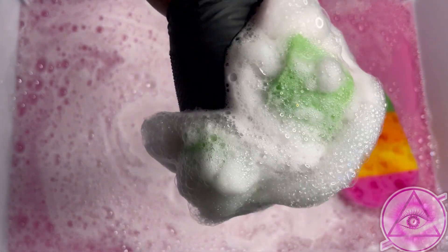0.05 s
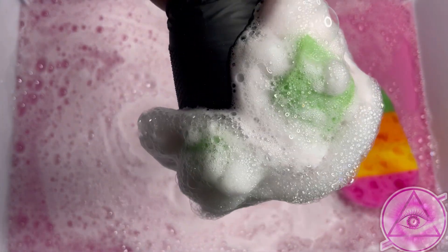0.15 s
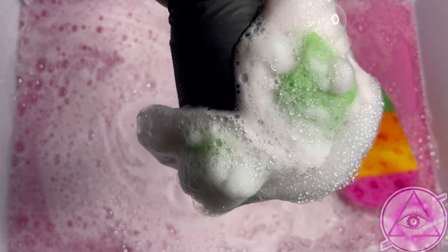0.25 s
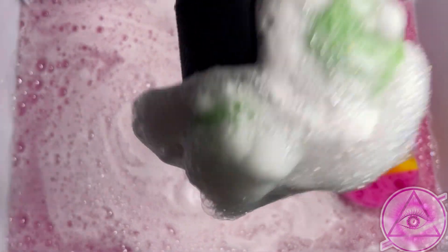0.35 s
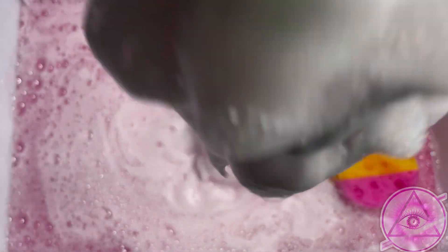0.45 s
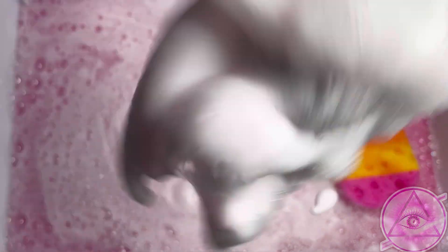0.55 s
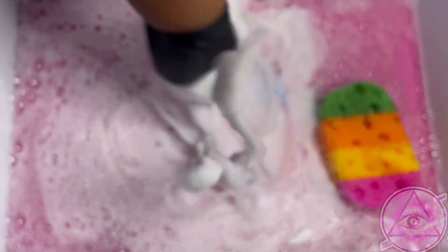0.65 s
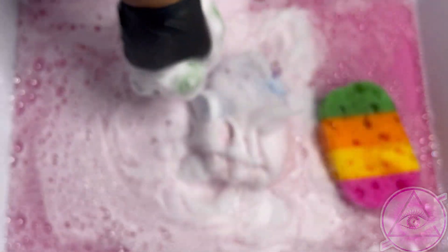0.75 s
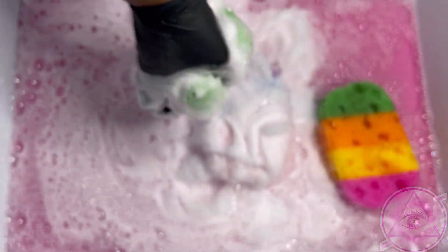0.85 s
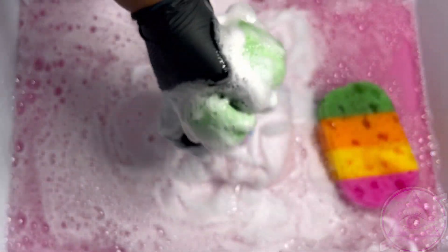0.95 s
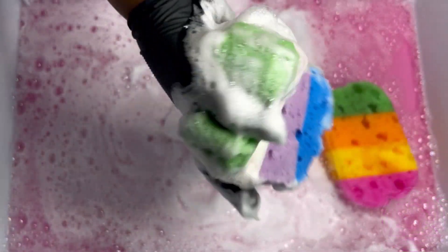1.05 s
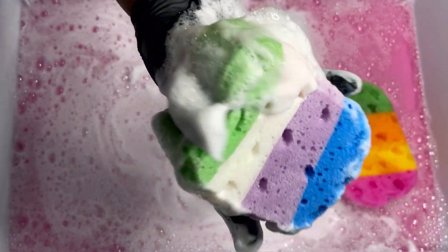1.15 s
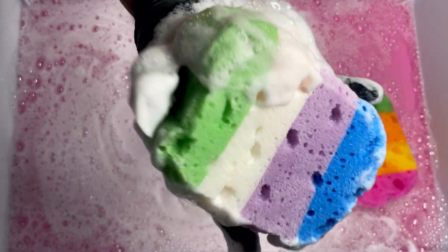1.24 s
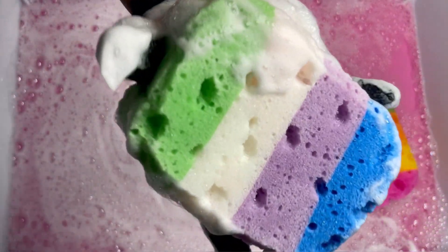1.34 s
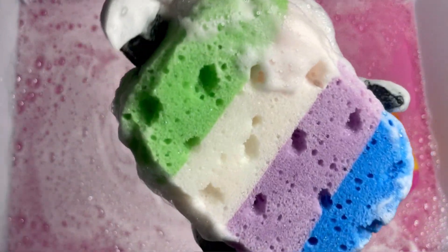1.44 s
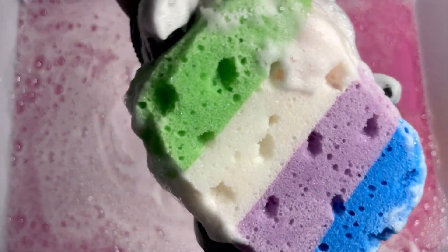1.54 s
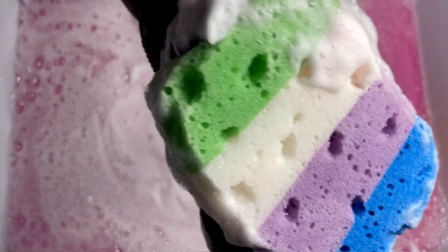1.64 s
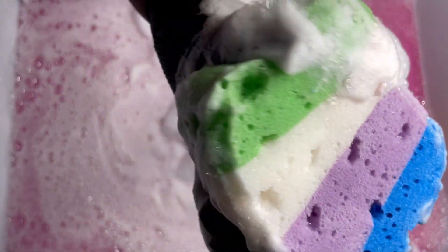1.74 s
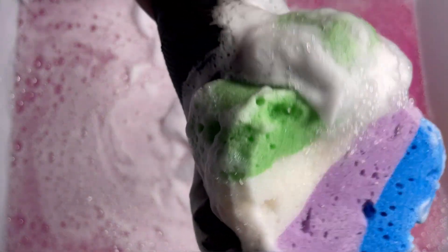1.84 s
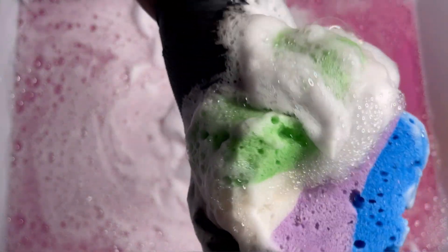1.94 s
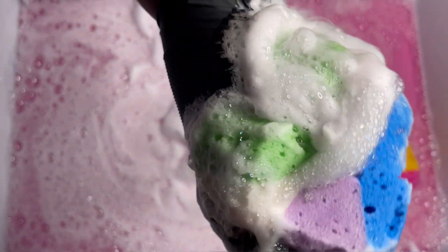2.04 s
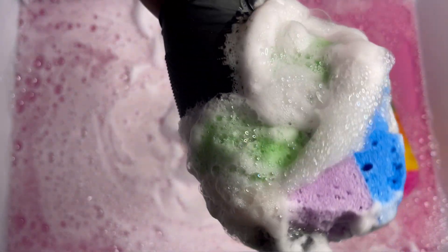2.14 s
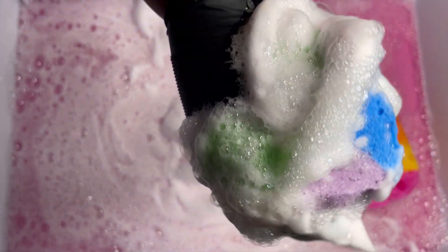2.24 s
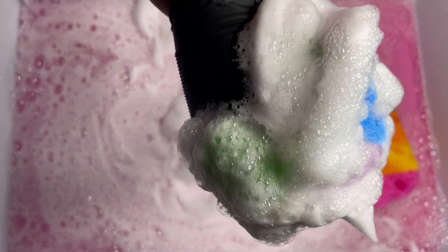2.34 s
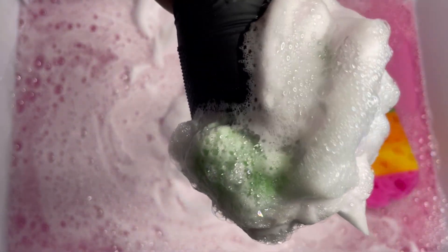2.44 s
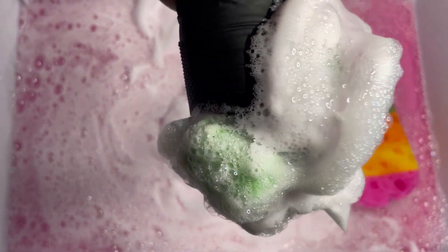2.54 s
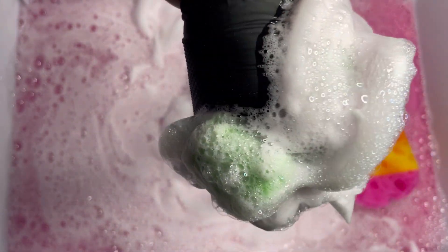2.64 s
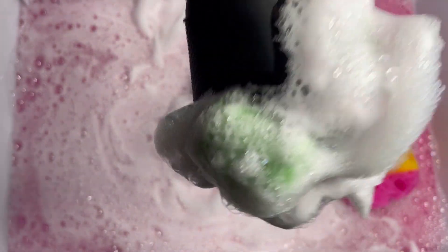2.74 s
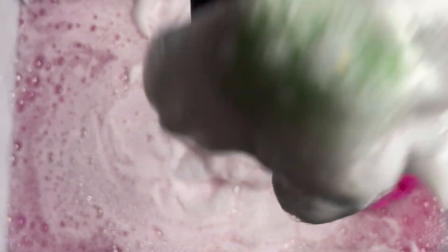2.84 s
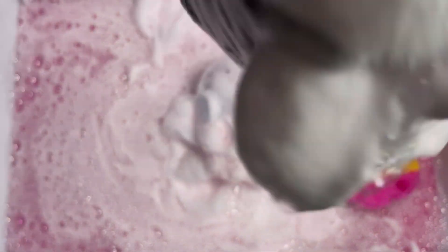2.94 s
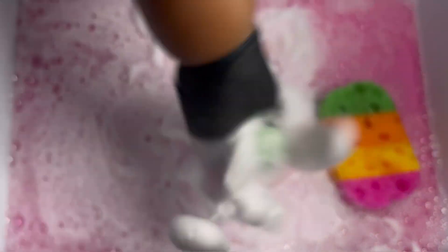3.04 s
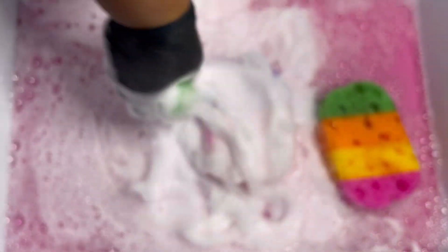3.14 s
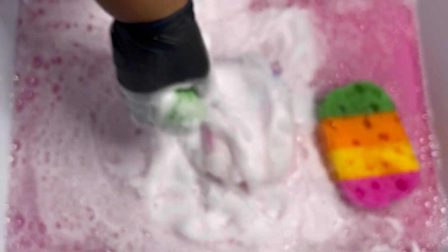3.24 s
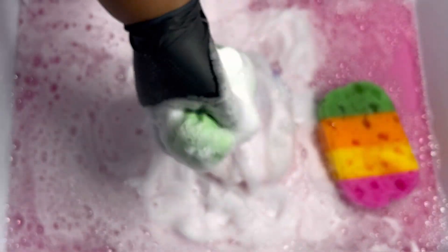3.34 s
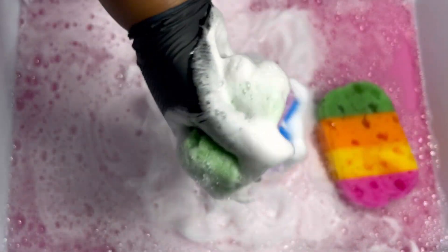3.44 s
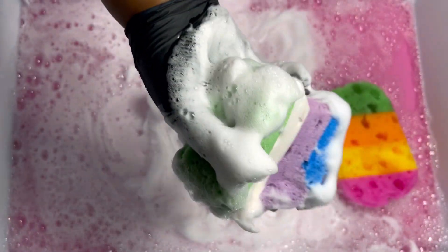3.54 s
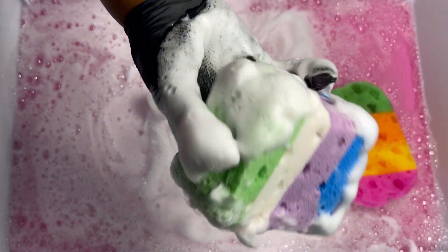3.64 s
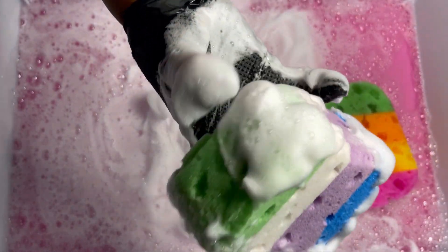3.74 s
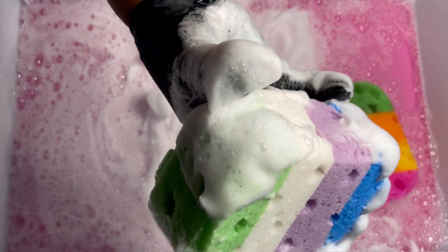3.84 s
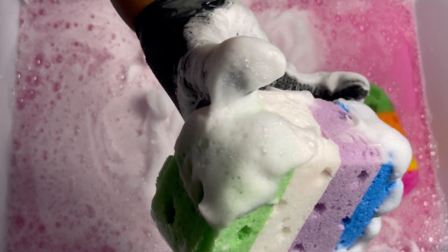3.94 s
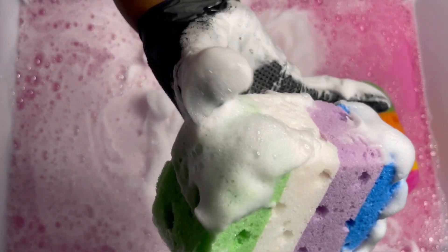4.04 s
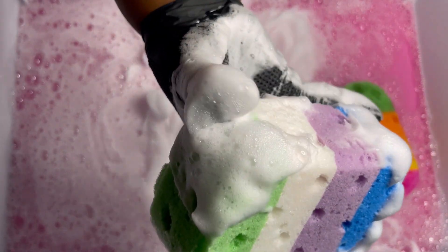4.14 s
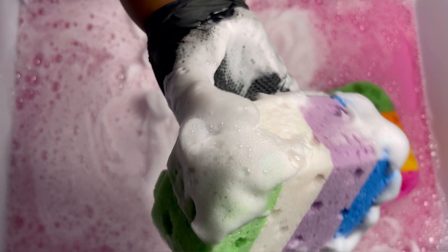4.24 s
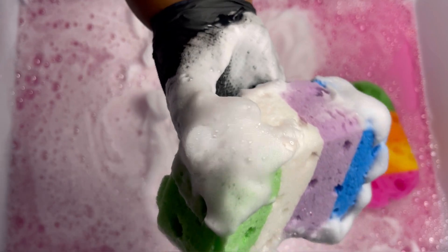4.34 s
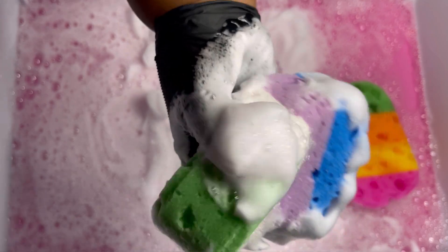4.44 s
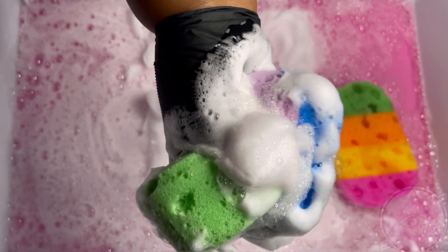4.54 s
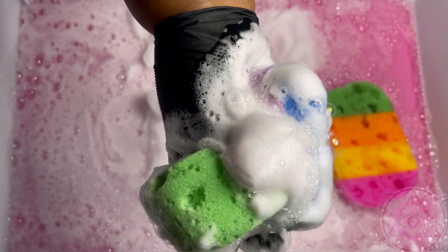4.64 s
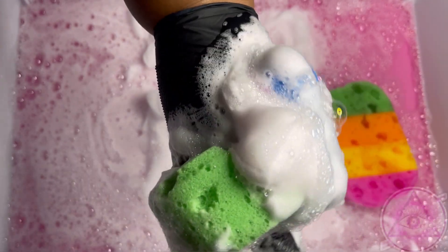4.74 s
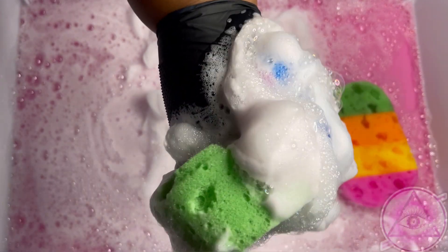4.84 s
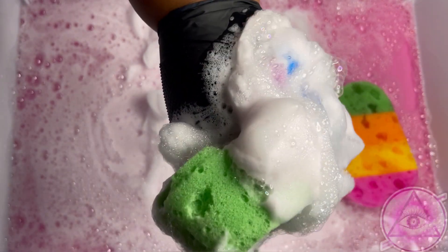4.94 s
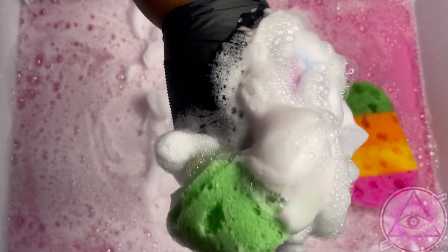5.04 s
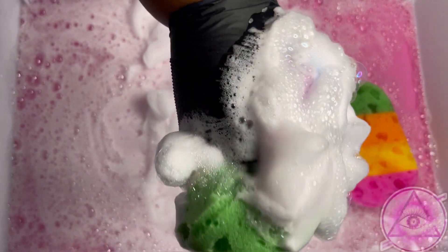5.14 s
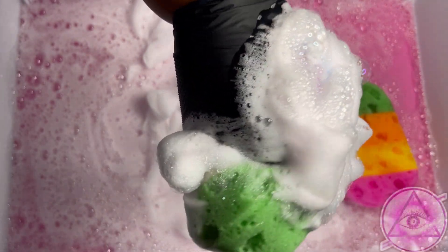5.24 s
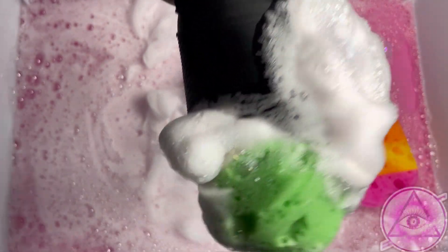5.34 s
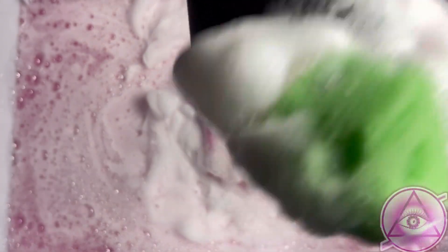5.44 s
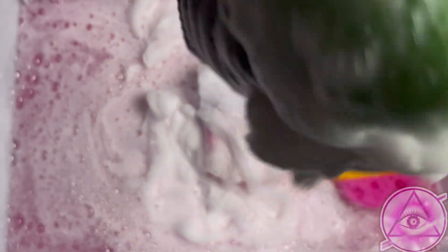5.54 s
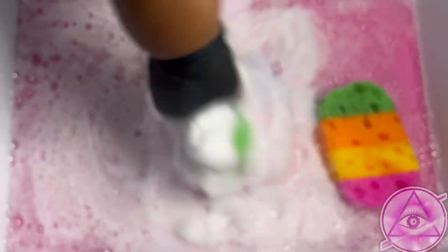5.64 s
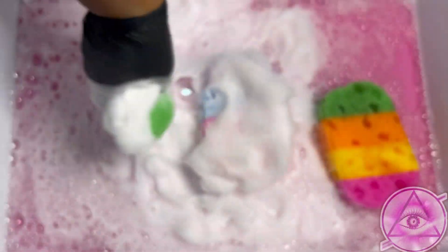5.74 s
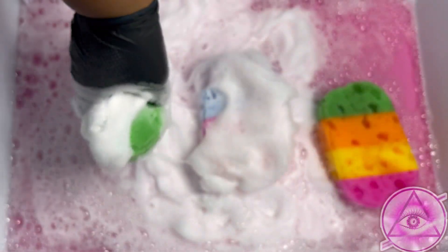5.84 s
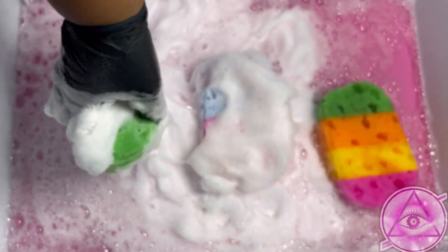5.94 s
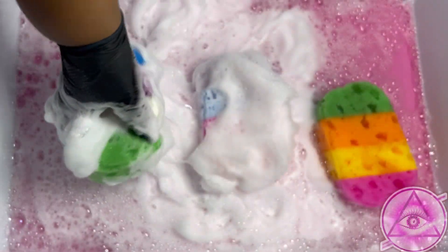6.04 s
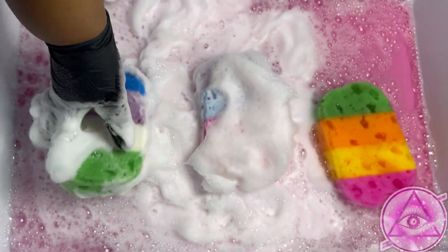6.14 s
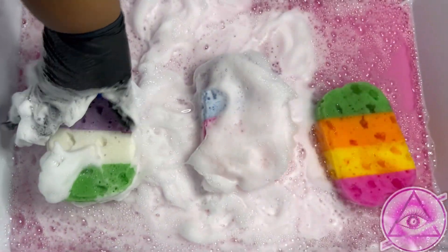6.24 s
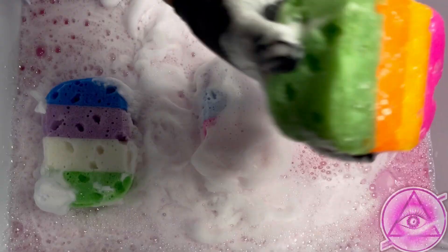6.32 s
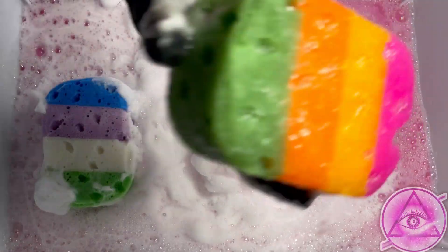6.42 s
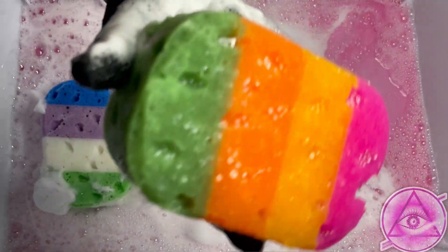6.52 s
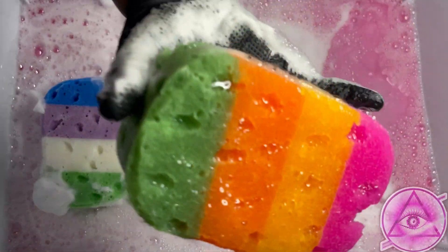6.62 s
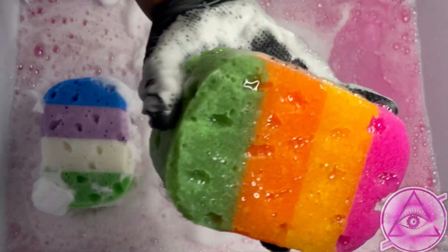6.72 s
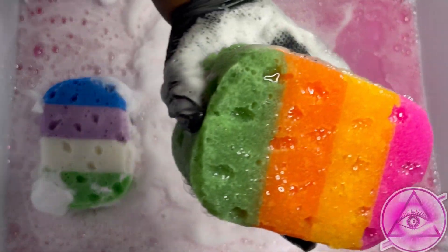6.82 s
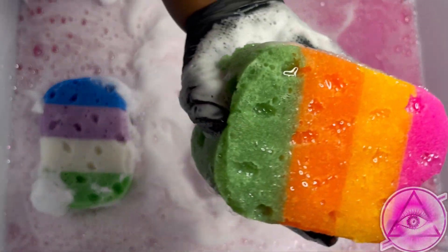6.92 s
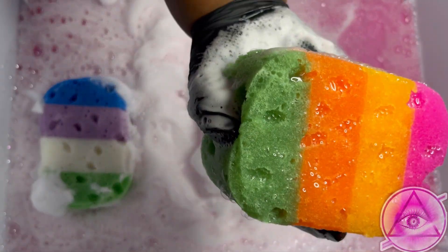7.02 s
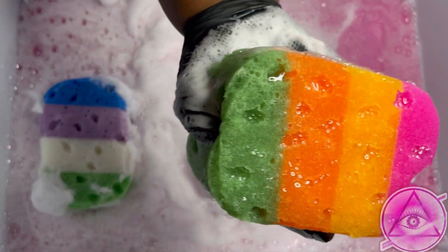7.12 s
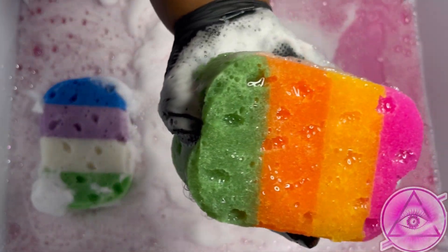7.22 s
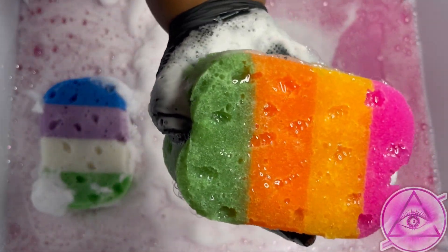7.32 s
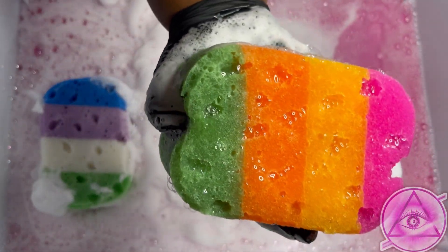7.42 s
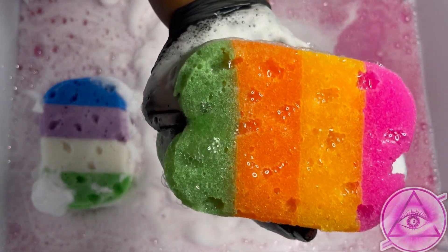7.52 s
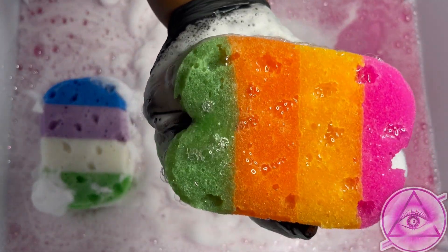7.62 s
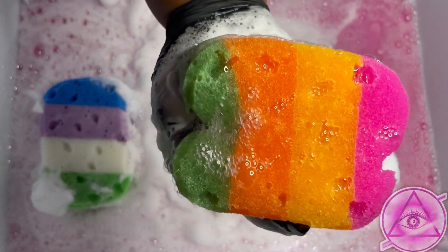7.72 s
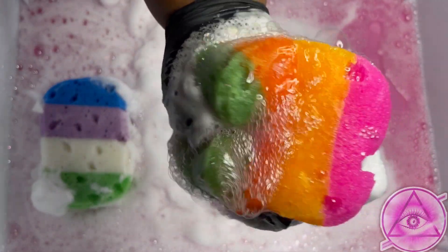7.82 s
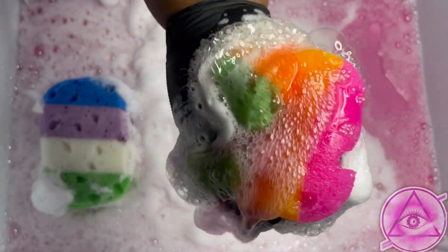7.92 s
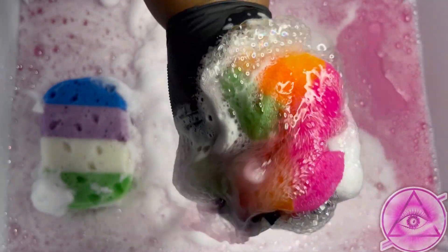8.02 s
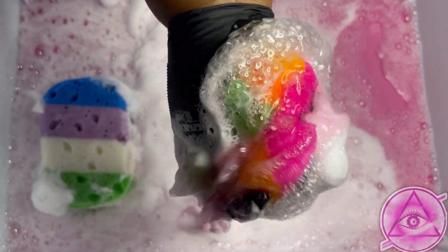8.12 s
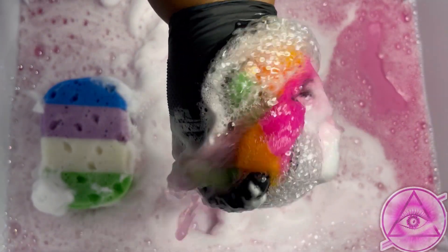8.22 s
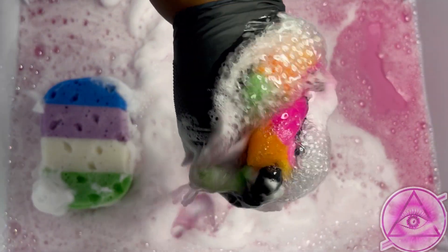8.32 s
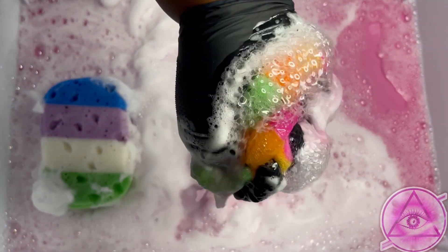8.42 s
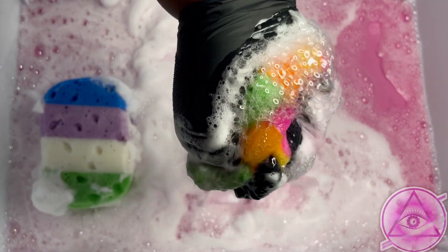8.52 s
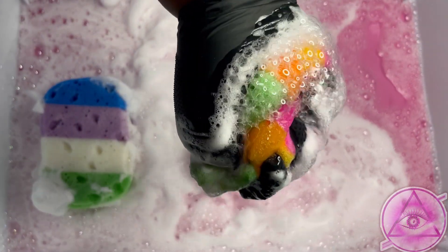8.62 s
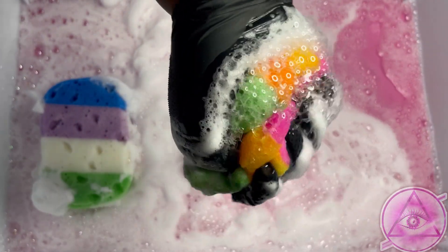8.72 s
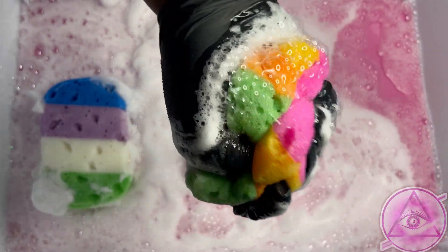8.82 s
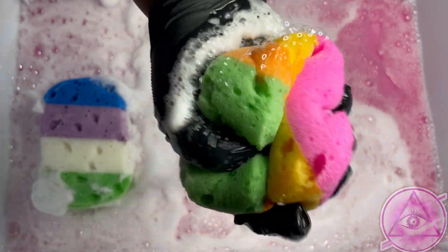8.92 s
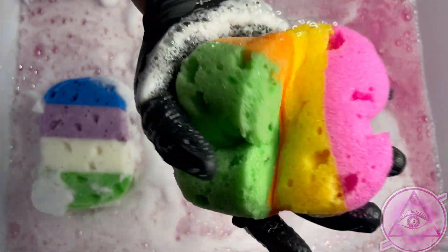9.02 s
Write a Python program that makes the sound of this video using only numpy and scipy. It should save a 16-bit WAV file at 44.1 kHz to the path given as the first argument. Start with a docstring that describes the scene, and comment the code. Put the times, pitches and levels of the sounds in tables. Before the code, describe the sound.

Soapy sponges are squeezed close up in a gloved hand: thick wet squelches, fizzing foam, sharp bubble cracks and splashy plops into a tub.

```python
"""A gloved hand squeezes soapy sponges over a plastic tub of foamy water, close to a pair of microphones.
Each squeeze drives air through wet pores: swarms of short ringing bubbles, from fine fizz to large squelch.
Soap films tear in sharp clicks, foam slaps down as shaped noise, and single bubbles snap at their own pitch.
Behind them the tub rumbles, runoff burbles, and gulps, a slap and the tub ring as short gliding sines.
Farthest back are quiet noise for the room air and a faint mains buzz of steady sines; a dull switch tick
sounds as the buzz steps down."""
import sys
import numpy as np
from scipy import signal
from scipy.fft import rfft, irfft, next_fast_len
from scipy.io import wavfile
from scipy.ndimage import uniform_filter1d

SR = 44100
rng = np.random.default_rng(int(sys.argv[2]) if len(sys.argv) > 2 else 0)


def dump_mix(stems):
    """Bounce the given channels to the path in sys.argv[1] as a 16-bit WAV at rate SR."""
    frames = np.atleast_2d(stems).T  # one column per channel
    limited = np.clip(frames, -1, 1)  # hard clip at full scale
    pcm = np.round(limited * 32767).astype(np.int16)
    wavfile.write(sys.argv[1], SR, pcm)


N = 399987
T = np.arange(N) / SR  # time axis [s]

# Levels in the event tables are those before the trims of the functions that play them.
# how hard the hand drives air through the sponge: (time [s], level [dB])
FIRST_SQUEEZE = [(0, -41.5), (0.06, -38.5), (0.15, -42.5), (0.33, -58.5), (0.47, -102.5)]
SECOND_SQUEEZE = [(1.44, -78.5), (1.582, -60.5), (1.738, -44.5), (2.0, -44.5), (2.26, -43.5), (2.34, -48),
                  (2.52, -49), (2.66, -43), (2.82, -53.5), (2.88, -91)]
THIRD_SQUEEZE = [(4.1, -71.5), (4.24, -57), (4.32, -59), (4.463, -40), (4.62, -48), (4.75, -46.5),
                 (4.86, -41.5), (5.04, -44), (5.14, -40.5), (5.29, -44), (5.46, -53), (5.53, -65)]
FRESH_SQUEEZE = [(7.58, -85), (7.7, -70), (7.81, -59), (8.04, -64), (8.12, -53.5), (8.3, -58), (8.45, -57),
                 (8.7, -55.5)]
RELEASE = [(8.701, -65), (8.738, -52.5), (8.77, -44), (8.92, -44), (9.07, -47.5)]
# when the fine and the medium bubbles give out, a row per stroke above: (fine over medium [dB],
# large over medium [dB], fine give out at [s], fine take [s], medium give out at [s])
FOAM_SIZES = [(-19, 7.5, 0.034, 0.97, 0.01), (1, -12, 2.22, 0.23, 2.22), (0.5, -3.5, 4.63, 0.87, 5.27),
              (4, -23, 8.7, 0.3, 7.6), (6.5, -6, 8.757, 0.72, 9.07)]
FINE_LOSS_DB, MEDIUM_LOSS_DB_PER_S = 34, 44
# the sponge is dipped, fizzes and sucks itself full: (lands [s], stays [s], fizz [dB],
# fullest suck after [s], suck [dB], surge of the water [dB])
DIPS = [(0.656, 0.55, -57, 0.19, -53, -54), (3.056, 0.62, -57.5, 0.57, -52.5, -50),
        (5.665, 0.52, -61, 0.25, -54.5, -61)]
DIP_RISE_S, DIP_FADE_DB_PER_S, DIP_LARGE_DB = 0.045, 93, -4
SUCK_RISE_S, SUCK_FADE_DB_PER_S = 0.11, 43
SURGE_LAG_S, SURGE_RISE_S, SURGE_FADE_DB_PER_S, SURGE_BURBLE_DB = 0.065, 0.084, 57, -2.5
# fingers shift in the foam and press out a spurt; the long row at 6.396 s is instead a soft steady hiss # while
# the buzz is louder: (time [s], length [s], large [dB], medium [dB], fine [dB])
TOUCHES = [(0.486, 0.035, -68, -84, -92), (2.755, 0.079, -48.5, -81, -88), (2.958, 0.061, -55.5, -74, -64),
           (3.768, 0.29, -94, -79.5, -68), (5.4, 0.057, -72, -76, -54), (5.56, 0.074, -62, -89, -72),
           (6.396, 0.445, -74.5, -76, -75), (6.962, 0.021, -75, -72, -82), (7.79, 0.46, -60.5, -67, -81),
           (8.229, 0.14, -54.5, -68, -49), (8.422, 0.18, -61.5, -78, -70)]
TOUCH_RISE_S, TOUCH_FADE_DB_PER_S = 0.028, 258
RESTING_FOAM_DB = (-81.5, -90, -80)  # large, medium, fine
# colours of the large, medium and fine bubbles: (frequency [Hz], relative density [dB per Hz])
LARGE_COLOUR = [(250, -59), (500, -12), (640, -6.5), (900, -5.5), (1250, -6), (1800, -7), (2600, -12),
                (3600, -36.5), (12000, -61)]
MEDIUM_COLOUR = [(400, -9), (700, -16), (1400, -13.5), (2000, -2.5), (2750, -1.5), (3500, -4), (5000, -4.5),
                 (7000, -8.5), (12000, -34)]
FINE_COLOUR = [(500, -13), (1500, -19), (3000, -1), (4200, 0), (6000, 1.5), (8300, 1.5), (11000, 6.5),
               (12000, -4.5), (13000, -27), (15000, -50)]
# air resonances around the sponge: (frequency [Hz], width [Hz], level [dB])
HOLLOW = [(696.3, 31, 5), (1127, 49, -7.5), (2465, 420, -13)]

# the fist closes fully and the films crackle: (time [s], length [s], level [dB])
WRINGS = [(0.01, 0.15, -55), (2.323, 0.21, -54.5), (2.54, 0.13, -52.5), (5.107, 0.21, -44.5),
          (8.22, 0.22, -59)]
WRING_RISE_S, WRING_FADE_DB_PER_S = 0.022, 138
# colours of a tearing film and of a crack: (frequency [Hz], relative density [dB per Hz])
FILM_COLOUR = [(400, -13), (700, 5), (1300, 13.5), (2600, 4.5), (3600, -18), (6500, -13.5), (9000, -32),
               (13000, -58)]
CRACK_COLOUR = [(300, -45.5), (800, -1.5), (1500, 1), (2450, 1.5), (3000, -3.5), (3800, -8), (6000, -13),
                (8500, -21), (11000, -18.5), (14000, -69)]
# pockets of air bursting out of the foam: (time [s], level [dB], treble tilt [dB])
CRACKS = [(0.128, -34, -14), (0.155, -37, -14), (0.4204, -65, -13), (0.651, -32, 7), (0.6554, -18, 11),
          (0.68, -39, 9), (0.7285, -36, 1), (2.305, -33, 4), (2.3577, -34, -5), (2.3935, -34, -5),
          (2.402, -31, 4), (2.416, -31, -1), (2.4361, -39, -3), (2.445, -27.5, -2), (2.4573, -33, -14),
          (2.629, -34, -3), (2.656, -27.5, -17), (2.701, -32, -2), (2.735, -30.5, -20), (2.796, -34, -14),
          (2.8095, -33, -7), (2.819, -31.5, -27), (3.0736, -30, 3), (3.083, -26, -3), (3.09, -26, 6),
          (5.124, -26.5, -17), (5.1338, -26, -12), (5.1456, -29.5, -6), (5.2182, -26, -4),
          (5.2721, -29, -6), (5.6688, -23, -21), (6.5757, -57, -8), (7.749, -47, -28)]
# loose suds bursting on the fresh sponge
SUDS_START_S, SUDS_LENGTH_S, SUDS_DB = 8.13, 0.5, -57.5
SUDS_RISE_S, SUDS_FADE_DB_PER_S = 0.022, 22
# colour of the suds: (frequency [Hz], relative density [dB per Hz])
SUDS_COLOUR = [(1500, -17), (3500, -6), (6500, -6), (8800, 2), (11000, 12), (12500, 1), (14000, -41)]
# single snaps of soap bubbles, and a dull switch tick at 6.843 s as the buzz steps down:
# (time [s], level [dB], treble tilt [dB], pitch [Hz])
SNAPS = [(0.373, -58, 6, 6000), (0.4415, -58, 25, 11000), (3.9593, -56, 12, 7000), (5.4249, -52, 4, 11000),
         (5.442, -41, -4, 10800), (6.843, -58.5, -32, 1105), (7.1797, -58, -22, 1620),
         (7.247, -56.5, -15, 2200), (7.478, -66, -8, 2500), (7.5197, -60.5, -4, 2500),
         (7.644, -59, 6, 6500), (7.974, -44.5, -14, 2200), (8.1079, -36.5, -1, 4450),
         (8.119, -44, -3, 4540), (8.1274, -35.5, -3, 5430), (8.1493, -35, 3, 5060), (8.184, -43, 4, 5800),
         (8.2274, -39, -2, 5400), (8.234, -41, 0, 6300), (8.2962, -41, -6, 2200), (8.3212, -39, -5, 3200),
         (8.341, -36, 2, 11000), (8.3706, -41, 3, 6000), (8.385, -43, -11, 3800), (8.4118, -34.5, -7, 2660),
         (8.4555, -45, -14, 3380), (8.4678, -35, -7, 4930), (8.498, -41, -12, 2480), (8.502, -44, -6, 5970),
         (8.519, -37, 3, 4400), (8.554, -38, -3, 4420), (8.5666, -38.5, -5, 4400), (8.573, -42, -6, 3800),
         (8.617, -40, 1, 11100), (8.626, -44.5, -6, 7100), (8.647, -41, -2, 4170), (8.6653, -39, -4, 3920),
         (8.677, -44, -7, 3900), (8.708, -41, 2, 7000)]
# colour of a snap: (frequency [Hz], relative density [dB per Hz])
SNAP_COLOUR = [(150, -61), (500, 4), (1200, -9), (2200, -12.5), (4000, 2), (6000, 3.5), (8500, 2),
               (11000, 7), (13000, -8), (15500, -41)]

# foam and sponge hitting the water:
# (time [s], level [dB], treble tilt [dB], decay by 60 dB [s], rise [s])
SLAPS = [(0.65, -34, -6, 0.011, 0.0019), (0.654, -25, -10, 0.0096, 0.00047),
         (0.664, -39, -17, 0.05, 0.0014), (0.677, -33, -15, 0.0097, 0.0011),
         (0.722, -39, -18.5, 0.02, 0.0084), (2.979, -39.5, -18.5, 0.016, 0.0028),
         (3.043, -43.5, -11, 0.074, 0.0048), (3.059, -39, -14, 0.031, 0.0047),
         (3.072, -33.5, -16, 0.048, 0.00097), (3.082, -28.5, -17, 0.034, 0.00085),
         (3.1, -35.5, -16.5, 0.012, 0.0025), (5.637, -41, -15, 0.13, 0.0057),
         (5.662, -34, -15, 0.012, 0.0021), (5.668, -31, -14, 0.0094, 0.0019),
         (5.688, -41.5, -24, 0.046, 0.016), (5.708, -40, -15, 0.035, 0.005)]
# the sponge's weight pushing into the water: (time [s], level [dB])
THUDS = [(0.654, -46), (3.076, -41), (3.102, -35.5), (5.674, -39.5), (5.718, -43), (6.139, -47)]
# colours of a slap and of a thud: (frequency [Hz], relative density [dB per Hz])
SPLAT_COLOUR = [(60, -30), (200, -7), (450, -8), (700, -1.5), (1000, -5.5), (1400, -0.5), (2400, -6),
                (3800, -2.5), (5000, 2), (8000, -3), (11000, 1), (13000, -18), (15000, -81)]
THUD_COLOUR = [(25, -31), (60, -6), (180, -4.5), (300, -4.5), (500, -8), (900, -14), (2000, -79)]

# short ringing notes: gulps of air in the water, and the ring of a slap and the tub:
# (time [s], level [dB], middle pitch [Hz], decay by 60 dB [s])
RINGING_NOTES = [(0.398, -48.5, 733, 0.089), (0.4204, -44.5, 730, 0.07), (0.466, -56.5, 136, 0.11),
                 (0.711, -49, 120, 0.098), (0.752, -44, 78.2, 0.4), (3.074, -33, 516, 0.072),
                 (3.079, -38.5, 300, 0.058), (3.086, -34, 209, 0.093), (3.102, -38, 55.3, 0.17),
                 (3.11, -47, 139, 0.085), (3.155, -41.5, 101, 0.14), (5.6685, -26.5, 2330, 0.0054),
                 (5.669, -31, 692, 0.075), (5.669, -42.5, 112, 0.26), (5.695, -35, 60, 0.22),
                 (5.771, -39, 68, 0.1), (6.139, -51, 206, 0.079), (7.985, -44.5, 52.6, 0.46),
                 (8.304, -41, 194, 0.051), (8.547, -42.5, 65, 0.38)]
# squeezed-out water runs into the tub:
# (time [s], length [s], rumble [dB], heaviest at [s], burble [dB])
RUNOFF = [(0, 0.042, -87, 0.024, -60.5), (2.05, 0.34, -68, 2.15, -59.5), (2.85, 0.15, -66, 3.02, -59.5),
          (4.597, 1.0, -57, 5.014, -51.5), (6.743, 0.68, -70.5, 6.85, -67),
          (8.154, 0.66, -55.5, 8.39, -49.5)]
RUMBLE_RISE_S, RUMBLE_FADE_DB_PER_S = 0.57, 23.5
BURBLE_RISE_S, BURBLE_FADE_DB_PER_S = 0.42, 17
RESTING_RUMBLE_DB, RESTING_BURBLE_DB = -79, -81
# colours of the rumble, the burble and the room air: (frequency [Hz], relative density [dB per Hz])
RUMBLE_COLOUR = [(15, -58.5), (27, -27), (42, 7.5), (53, 5.5), (72, -7), (120, -12), (250, -66.5)]
BURBLE_COLOUR = [(60, -25.5), (110, 4), (160, -3.5), (220, 1), (310, 1), (450, 3.5), (800, -5.5),
                 (2000, -90)]
AIR_COLOUR = [(20, -36), (60, -1.5), (100, 1), (250, -11.5), (700, -1), (1100, -11), (1700, -30),
              (4000, -23), (8000, -45), (11000, -77), (14500, -40)]

# spells of louder electric buzz: (start [s], stop [s], level [dB])
BUZZ_SPELLS = [(0.0, 0.65, 0), (6.355, 6.855, -0.5)]
IDLE_BUZZ_DB, MAINS_HZ = -13, 60
# partials of the buzz, each moved to the nearest mains multiple: (frequency [Hz], rms level [dB])
BUZZ_PARTIALS = [(899.0, -83.5), (1017, -83), (1200, -83), (1260, -84), (1378, -85.5), (1437, -81),
                 (1561, -85), (1680, -91), (1922, -90), (2040, -87), (2218, -88), (2401, -91), (2579, -99),
                 (2702, -91)]

# how far the left microphone leads the right: (frequency [Hz], phase [radians])
LEAD = [(0, 0), (150, .7), (350, 1.8), (520, 2.75), (605, 3.14), (700, 4.0), (1000, 4.3), (1750, 6.1),
        (2400, 6.3), (3200, 5.8), (4200, 7.2), (4850, 9.4), (5750, 12.3), (6400, 12.8), (8300, 15.1),
        (9400, 15.7), (12000, 18.8)]
# how alike the two microphones hear the sound: (frequency [Hz], likeness [0-1])
LIKENESS = [(40, .98), (300, .86), (700, .97), (1300, .8), (2000, .85), (3000, .5), (4700, .45),
            (5700, .95), (8000, .9), (12000, .97)]
# left microphone over right: (frequency [Hz], level [dB])
BALANCE = [(40, 3), (100, 3), (270, 6.5), (600, 1.5), (1300, -2.5), (2100, .5), (3200, -.5), (4900, -2),
           (5800, .3), (12000, 0)]
EDGE_HZ = 15500  # upper band limit of the recorder


def sponge(large, medium, fine, large_db=-3.0, medium_db=-3.5, fine_db=-1.0):
    """Air forced through wet pores bursts as bubbles of three sizes; the larger ring lower."""
    squelch = bubbles(LARGE_COLOUR, 550, 3630, per_s=9000, cycles=2.65, spread_db=-0.06, clump_db=0.57)
    froth = bubbles(MEDIUM_COLOUR, 845, 7740, per_s=5000, cycles=2.23, spread_db=0.0, clump_db=0.5)
    fizz = bubbles(FINE_COLOUR, 1050, 19300, per_s=9700, cycles=3.46, spread_db=0.8, clump_db=2)
    coarse = large * gain_of(large_db) * squelch + medium * gain_of(medium_db) * froth
    return coarse + fine * gain_of(fine_db) * fizz


def strokes(level_db=2):
    """Loudness of large, medium and fine bubbles: the mix of sizes changes within each stroke."""
    out = np.zeros((3, N))
    efforts = (FIRST_SQUEEZE, SECOND_SQUEEZE, THIRD_SQUEEZE, FRESH_SQUEEZE, RELEASE)
    for effort, sizes in zip(efforts, FOAM_SIZES):
        fine_db, large_db, fine_ends, over_s, medium_ends = sizes
        times, db = np.transpose(effort)
        now = (T >= times[0]) & (T <= times[-1])
        t = T[now]
        large = np.full(len(t), large_db)
        medium = -MEDIUM_LOSS_DB_PER_S * np.maximum(t - medium_ends, 0)
        fine = fine_db - FINE_LOSS_DB * np.clip((t - fine_ends) / over_s, 0, 1)
        shares = gain_of([large, medium, fine])
        shares = shares / np.linalg.norm(shares, axis=0)  # the effort alone sets the total power
        out[:, now] = shares * gain_of(np.interp(t, times, db) + level_db)
    return out


def bubbling():
    """Loudness of the three bubble sizes: strokes, dips, touches and resting foam add in power."""
    power = strokes() ** 2 + gain_of(RESTING_FOAM_DB)[:, None] ** 2
    for s, stay, fizz_db, suck_after, suck_db, _ in DIPS:
        under = swell(s, stay, DIP_RISE_S, DIP_FADE_DB_PER_S)
        suck = gain_of(suck_db) * swell(s + suck_after, 0, SUCK_RISE_S, SUCK_FADE_DB_PER_S)
        fizz = gain_of(fizz_db) * under
        power += np.array([gain_of(DIP_LARGE_DB) * fizz, suck * under, fizz]) ** 2
    for s, length, *sizes_db in TOUCHES:
        spurt = swell(s, length, TOUCH_RISE_S, TOUCH_FADE_DB_PER_S)
        power += (gain_of(sizes_db)[:, None] * spurt) ** 2
    return np.sqrt(power)


def bubbles(colour, low_hz, high_hz, per_s, cycles, spread_db, clump_db, count=14):
    """A clumping swarm of bursting bubbles: each swells and rings for a few cycles; unit rms."""
    chance = per_s / SR * gain_of(clump_db * wander(90))
    at = np.flatnonzero(rng.random(N) < chance)
    size, kind, sign = rng.random((3, N))[:, at]
    height_db = spread_db * np.minimum(-np.log(1 - size), 4.5)
    height = gain_of(height_db) * np.sign(sign - .5)
    swarm = np.zeros(N + SR)
    for k, hz in enumerate(np.geomspace(low_hz, high_hz, count)):
        turns = np.arange(int(cycles * SR / hz) + 2) * hz / SR
        age = 10 * turns / cycles
        ring = np.sin(2 * np.pi * turns) * age ** 2 * np.exp(-age)
        ring = ring * np.sqrt(hz)  # evens the energy of short and long rings
        mine = (kind * count).astype(int) == k
        places = at[mine, None] + np.arange(len(ring))
        rings = height[mine, None] * ring
        swarm += np.bincount(places.ravel(), rings.ravel(), len(swarm))
    return evened(coloured(swarm[:N], colour))


def hollow(x):
    """Air resonances of the tub and cupped hand lend every squelch the same hollow note."""
    out = x
    for hz, width, db in HOLLOW:
        b, a = signal.iirpeak(hz, hz / width, SR)
        out = out + gain_of(db) * signal.lfilter(b, a, x)
    return out


def films(large, medium, fine, tear_db=-10.5, crackle_db=-9, prickle_db=-8):
    """Films tear among large bubbles, prickle among fine ones, crackle among medium ones and in wrings."""
    wrung = np.zeros(N)
    for s, length, db in WRINGS:
        wrung += gain_of(db) * swell(s, length, WRING_RISE_S, WRING_FADE_DB_PER_S)
    tears = large * gain_of(tear_db) * crackle(FILM_COLOUR, per_s=600, spread_db=13)
    prickles = fine * gain_of(prickle_db) * crackle(FINE_COLOUR, per_s=320, spread_db=11.0)
    crackling = np.hypot(wrung, medium * gain_of(crackle_db))
    return tears + prickles + crackling * crackle(CRACK_COLOUR, per_s=650, spread_db=6.5)


def crackle(colour, per_s, spread_db):
    """Soap films tear at random moments, each with a single sharp click; unit rms."""
    chance, size = rng.random((2, N))
    clicks = (chance < per_s / SR) * gain_of(spread_db * size)
    return evened(coloured(clicks, colour))


def cracks():
    """Pockets of air burst out of the foam, each with one dry crack."""
    out = np.zeros(N)
    for s, db, treble_db in CRACKS:
        add(out, s, gain_of(db) * click(CRACK_COLOUR, treble_db))
    return out


def suds():
    """The fresh sponge sheds loose, glassy suds: separate little bursts over a wide range of pitches."""
    bursts = bubbles(SUDS_COLOUR, 2600, 13500, per_s=300, cycles=6, spread_db=2.8, clump_db=3, count=28)
    shape = swell(SUDS_START_S, SUDS_LENGTH_S, SUDS_RISE_S, SUDS_FADE_DB_PER_S)
    return gain_of(SUDS_DB) * shape * bursts


def snaps(click_db=5.5, spray_db=-5.0, bright_db=2, spray_t60=0.019):
    """Single snaps of soap bubbles and a dull switch tick, each a click and brief spray at its own pitch."""
    out = np.zeros(N)
    for s, db, treble_db, hz in SNAPS:
        colour = ringing(SNAP_COLOUR, hz, ring_db=8, octaves=0.28)
        tilt_db = treble_db + bright_db
        t60 = spray_t60 * rng.uniform(.5, 1.5)
        spray = burst(t60, colour, tilt_db, rise_s=.0003, spatter_db=-32)
        snap = gain_of(click_db) * click(colour, tilt_db) + gain_of(spray_db) * spray
        add(out, s, gain_of(db) * snap)
    return out


def slaps(level_db=-5, spray_db=6, thud_db=-4):
    """Foam lumps and the sponge land on the water: wet splats, and dull thuds from the sponge's weight."""
    out = np.zeros(N)
    for s, db, treble_db, t60, rise_s in SLAPS:
        splat = burst(t60, SPLAT_COLOUR, treble_db + spray_db, rise_s, spatter_db=-18)
        add(out, s, gain_of(db + level_db) * splat)
    for s, db in THUDS:
        thud = burst(0.16, THUD_COLOUR, 0, rise_s=0.0016, spatter_db=-13)
        add(out, s, gain_of(db + thud_db) * thud)
    return out


def water(rumble_db=-1.0, burble_db=-6.5):
    """The tub rumbles as low noise while runoff burbles into it as slow, low-pitched bubbles."""
    burble = bubbles(BURBLE_COLOUR, 93.4, 540, per_s=1500, cycles=7.1, spread_db=1, clump_db=1.5)
    rumbling, burbling = stirring()
    rumble = noise(RUMBLE_COLOUR) * rumbling * gain_of(rumble_db)
    return rumble + burble * burbling * gain_of(burble_db)


def stirring():
    """Loudness of the tub's rumble and burble: runoff builds them up, and each dip sends a surge."""
    rumble, burble = gain_of(RESTING_RUMBLE_DB) ** 2, gain_of(RESTING_BURBLE_DB) ** 2  # powers
    for s, length, rumble_db, heaviest, burble_db in RUNOFF:
        rumbling = gain_of(rumble_db) * swell(s, length, RUMBLE_RISE_S, RUMBLE_FADE_DB_PER_S)
        burbling = gain_of(burble_db) * swell(heaviest, 0, BURBLE_RISE_S, BURBLE_FADE_DB_PER_S)
        rumble = rumble + rumbling ** 2
        burble = burble + burbling ** 2
    for s, *_, surge_db in DIPS:
        surge = gain_of(surge_db) * swell(s + SURGE_LAG_S, 0, SURGE_RISE_S, SURGE_FADE_DB_PER_S)
        rumble = rumble + surge ** 2
        burble = burble + (gain_of(SURGE_BURBLE_DB) * surge) ** 2
    return np.sqrt(rumble), np.sqrt(burble)


def ringing_notes(level_db=-3.0, swell_s=0.0018, sag_hz=12):
    """Gulps of air in the water, and the ring of a slap and the tub: decaying sines that sag in pitch."""
    out = np.zeros(N)
    t = T[:SR // 2]
    sag = sag_hz * (2 * np.exp(-t / 0.049) - 1)  # from above the middle pitch to as far below
    for s, db, hz, t60 in RINGING_NOTES:
        turns = np.cumsum(hz + sag) / SR
        shape = (1 - np.exp(-t / swell_s)) * gain_of(-60 * t / t60)
        note = shape / shape.max() * np.sin(2 * np.pi * turns)
        add(out, s, gain_of(db + level_db) * note)
    return out


def room_air(level_db=-71.5):
    """Quiet steady air of the place: separate coloured noise at each microphone."""
    return gain_of(level_db) * np.array([noise(AIR_COLOUR), noise(AIR_COLOUR)])


def buzz():
    """A faint electric buzz: sines on multiples of the mains frequency, with abrupt level steps."""
    level = np.full(N, gain_of(IDLE_BUZZ_DB))
    for start, stop, db in BUZZ_SPELLS:
        level[(T >= start) & (T < stop)] = gain_of(db)
    lines = np.zeros(N)
    for hz, db in BUZZ_PARTIALS:
        multiple_hz = round(hz / MAINS_HZ) * MAINS_HZ
        lines += gain_of(db) * np.sin(2 * np.pi * (multiple_hz * T + rng.random()))
    return np.sqrt(2) * lines * uniform_filter1d(level, size=400)


def microphones(x, clicks, room_db=-24):
    """Two close microphones hear the sound out of step, with unlike reflections; clicks arrive directly."""
    size = next_fast_len(N + 4096, True)
    hz = np.fft.rfftfreq(size, 1 / SR)
    same = np.clip(read(LIKENESS, hz), 0, 1)
    direct = rfft(x, size) * np.sqrt(same) + rfft(clicks, size)
    left, right = (direct + rfft(shifting_echoes(x), size) * np.sqrt(1 - same) for _ in range(2))
    lean = gain_of(read(BALANCE, hz) / 2)
    lag = np.exp(-1j * np.interp(hz, *np.transpose(LEAD)))
    near = irfft(np.array([left * lean, right * lag / lean]), size)[:, :N]
    room = np.array([echoes(x + clicks, .3) for _ in range(2)])
    return near + gain_of(room_db) * room


def shifting_echoes(x):
    """Each bubble bursts in another place: two sets of tub reflections trade weight at random."""
    place = 2 * wander(25)
    return echoes(x, .013) * np.cos(place) + echoes(x, .013) * np.sin(place)


def echoes(x, t60):
    """Dense reflections that die away, their overall spectrum flattened."""
    t = T[:16384]
    tail = rfft(rng.standard_normal(len(t)) * gain_of(-60 * t / t60))
    power = uniform_filter1d(abs(tail) ** 2, 120)
    return signal.oaconvolve(x, irfft(tail / np.sqrt(power)))[:N]


def burst(t60, colour, treble_db, rise_s, spatter_db):
    """A wet splash of noise with a faint spatter after it; its peak rms over 2 ms is one."""
    t = T[:6000]
    spatter = gain_of(spatter_db - 60 * t / .08)
    fall = gain_of(-60 * t / max(t60, .001)) + spatter
    shape = fall * (1 - np.exp(-(t / rise_s) ** 2))
    splash = coloured(rng.standard_normal(len(t)) * shape, tilted(colour, treble_db))
    return splash / np.sqrt(uniform_filter1d(splash ** 2, size=88).max())


def click(colour, treble_db):
    """A single sharp click of unit peak: the impulse response of a colour."""
    ring = coloured(signal.unit_impulse(6000), tilted(colour, treble_db))
    return ring / abs(ring).max()


def tilted(colour, treble_db):
    """A colour with its treble tilted: nothing below 2.5 kHz, the full amount from 5 kHz up."""
    return [(hz, db + treble_db * np.clip(np.log2(hz / 2500), 0, 1)) for hz, db in colour]


def ringing(colour, ring_hz, ring_db, octaves):
    """A colour with a resonant peak at one pitch."""
    hz = np.geomspace(100, 16000, 90)
    peak = ring_db / (1 + (np.log2(hz / ring_hz) / octaves) ** 2)
    return list(zip(hz, read(colour, hz) + peak))


def swell(start, length, rise_s, fade_db_per_s):
    """An envelope that grows exponentially up to its start, holds, and dies away."""
    early, late = np.maximum(start - T, 0), np.maximum(T - start - length, 0)
    return np.exp(-early / rise_s) * gain_of(-fade_db_per_s * late)


def wander(per_s):
    """A random curve of unit rms: straight lines between so many random points a second."""
    knots = rng.standard_normal(4000)
    return evened(np.interp(T * per_s, np.arange(len(knots)), knots))


def noise(colour):
    """Steady coloured noise of unit rms."""
    return evened(coloured(rng.standard_normal(N), colour))


def coloured(x, colour):
    """Minimum-phase filter with the given spectrum, so that clicks keep their sharp front."""
    size = 4096
    log_gain = np.log(gain_of(read(colour, abs(np.fft.fftfreq(size, 1 / SR)))))
    taps = np.fft.ifft(np.exp(np.conj(signal.hilbert(log_gain)))).real
    return signal.oaconvolve(x, taps[:size // 2])[:len(x)]


def read(points, hz):
    """Reads a table on a log-frequency axis."""
    f, value = np.transpose(points)
    return np.interp(np.log(hz + 1), np.log(f + 1), value)


def gain_of(db):
    """Decibels to an amplitude factor."""
    return 10 ** (np.asarray(db) / 20)


def evened(x):
    """Scales to unit rms."""
    return x / np.sqrt(np.mean(x ** 2) + 1e-20)


def add(mix, s, sound):
    """Mixes a sound in at a time in seconds."""
    part = mix[max(round(s * SR), 0):][:len(sound)]
    part += sound[:len(part)]


def scene():
    """Sponge and water close to the microphones, over quiet room air and a faint buzz."""
    sizes = bubbling()
    foam = hollow(sponge(*sizes) + slaps())
    clicks = hollow(films(*sizes) + cracks() + suds() + snaps())
    return microphones(foam + water() + ringing_notes(), clicks) + room_air() + buzz()


def record(dry):
    """The recorder's band limit: a steep low-pass filter."""
    low_pass = signal.firwin(511, EDGE_HZ, window=("kaiser", 9), fs=SR)
    return signal.oaconvolve(dry, low_pass[None], "same")


dry = scene()
out = record(dry)
dump_mix(out)
```